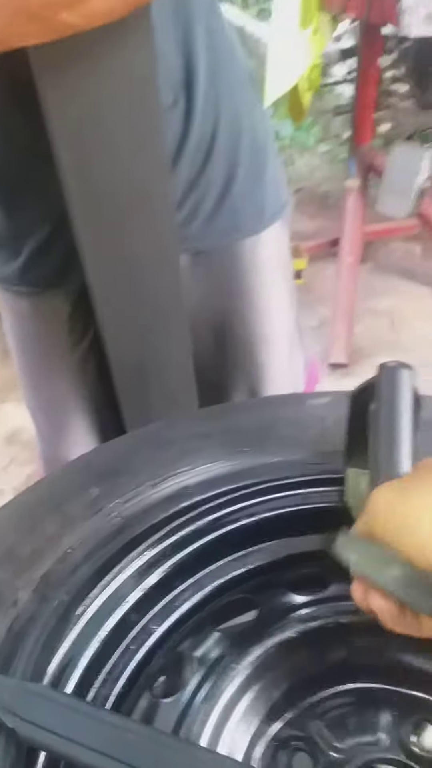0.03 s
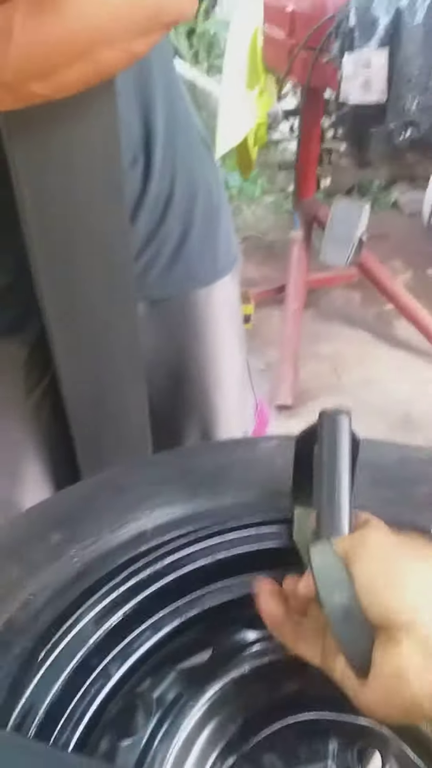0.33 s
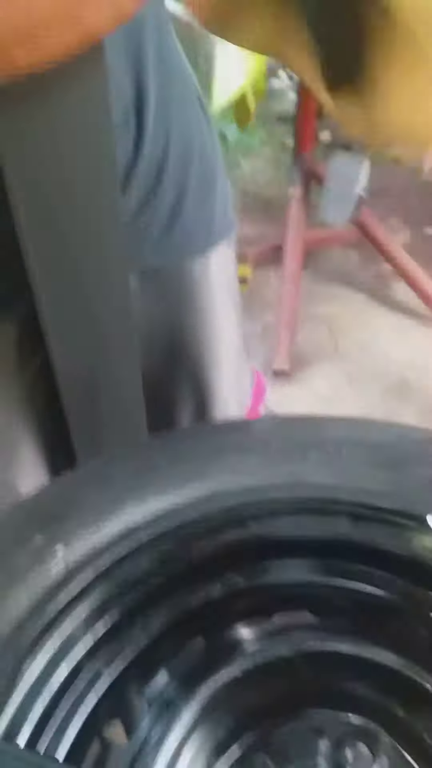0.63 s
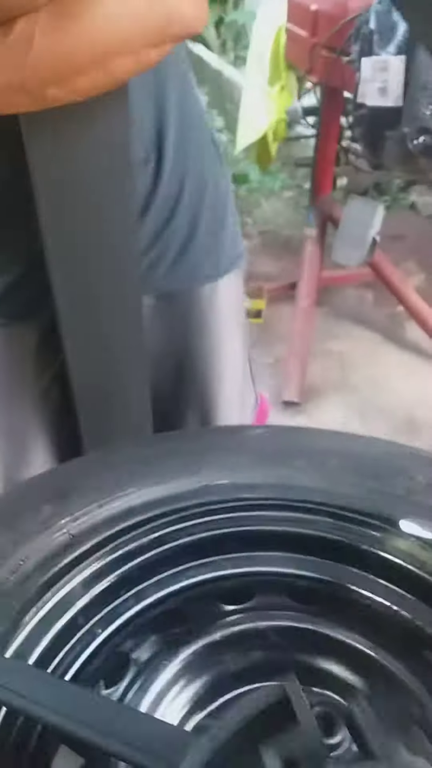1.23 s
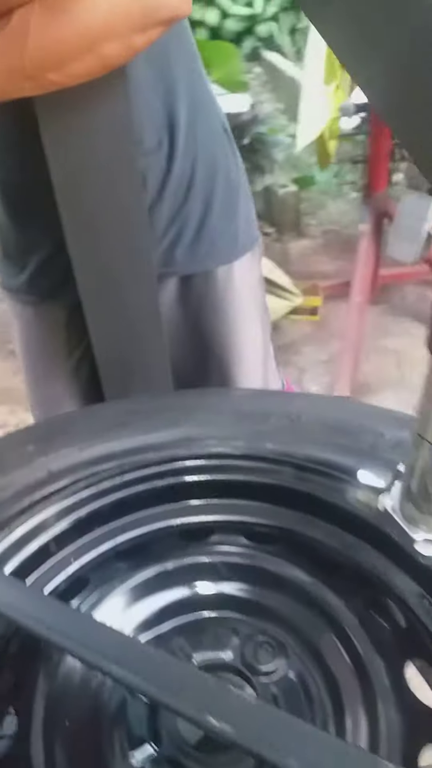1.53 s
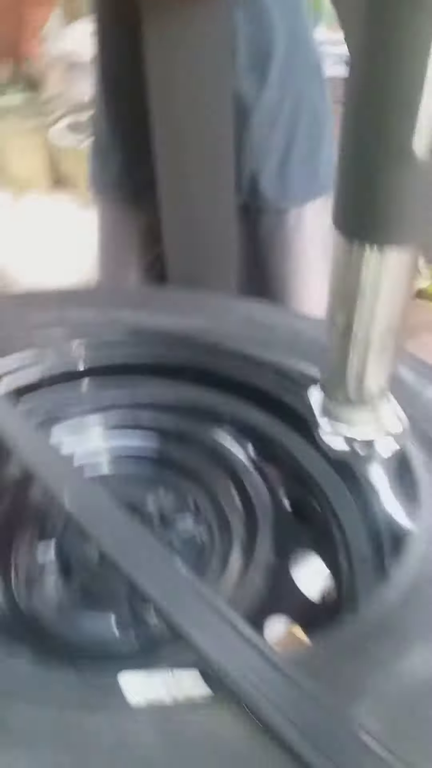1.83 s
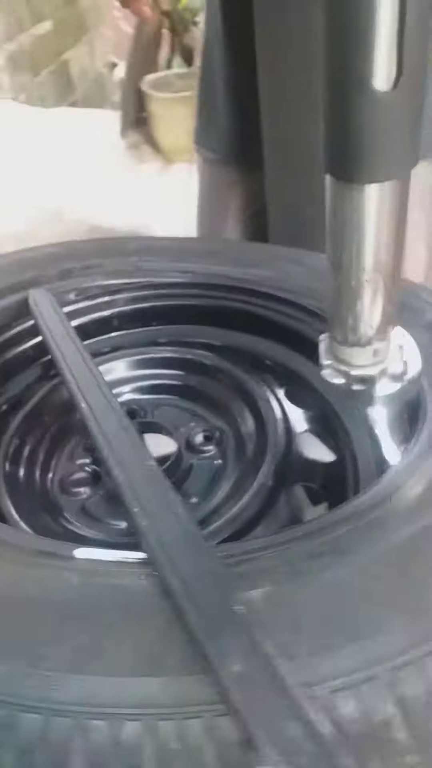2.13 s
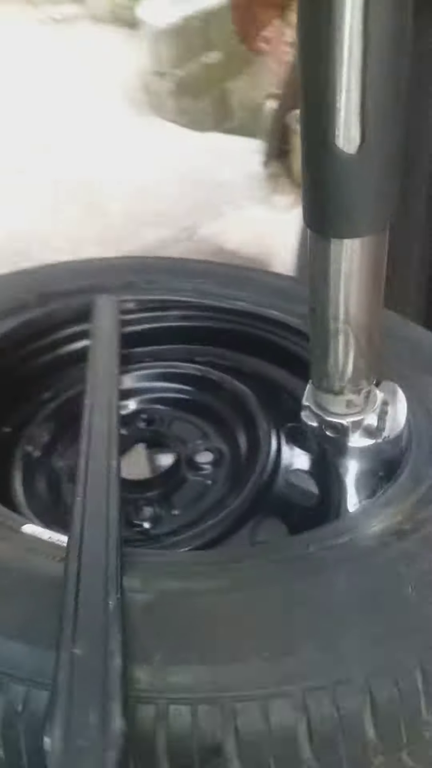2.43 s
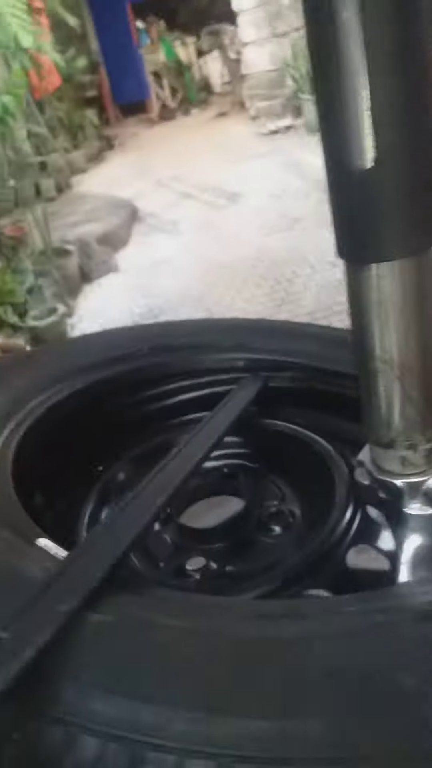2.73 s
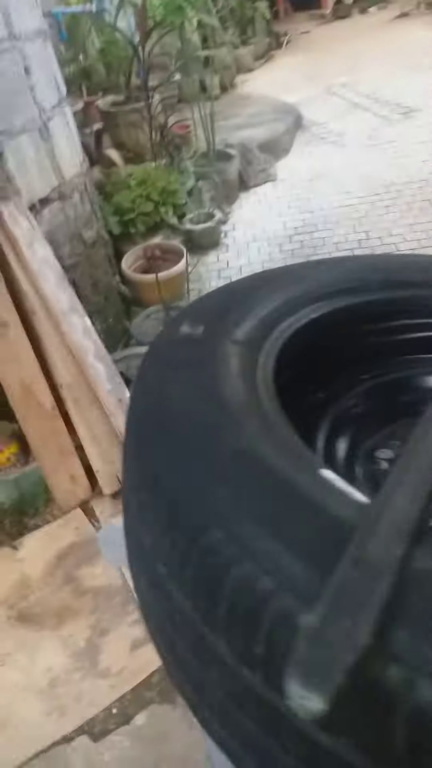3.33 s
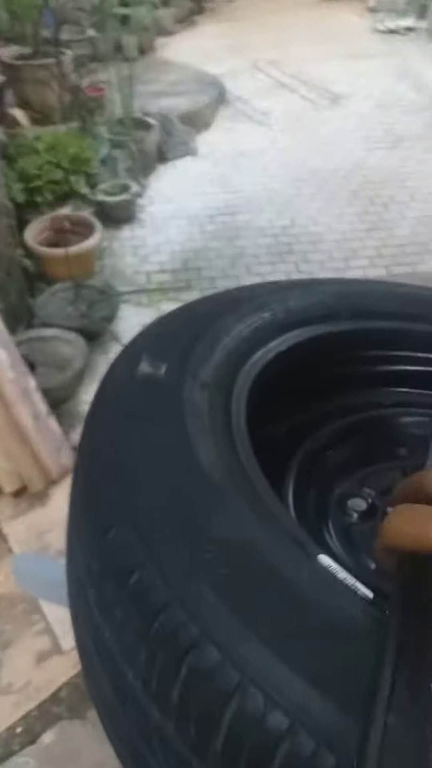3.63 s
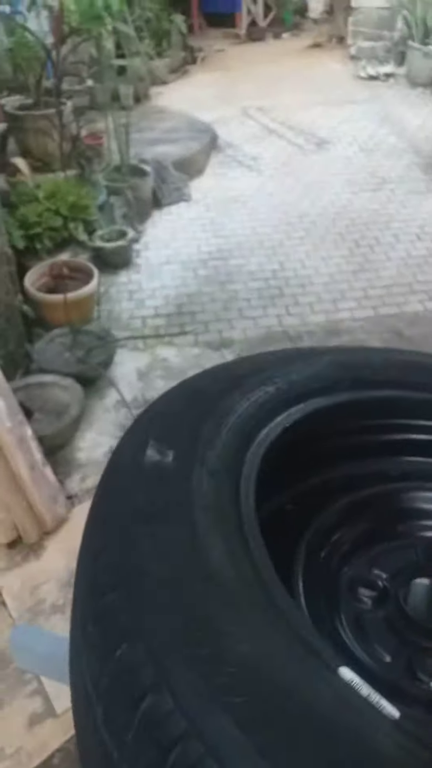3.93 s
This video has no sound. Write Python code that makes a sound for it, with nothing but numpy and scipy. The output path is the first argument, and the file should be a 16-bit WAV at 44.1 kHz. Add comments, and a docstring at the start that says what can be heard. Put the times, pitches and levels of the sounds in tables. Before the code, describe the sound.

Steel tools clank on a wheel rim, close up in an open yard. A scrape and clink lead to a bouncing clang; after a lull a tyre lever rattles, clacks and rings once more, over soft handling bumps.

```python
"""A short scrape, a squeak and two soft bumps, then the clink of a hand tool: work at a tyre changer
in an open yard, heard from a hand-held microphone close to the wheel. Steel drops on the rim and
bounces; later a tyre lever rattles under quick blows, and rings once more at the end. Between them
come damped clacks, sliding friction and handling bumps, over a low rumble and quiet air.
The yard returns a thin tail of reflections, and a limiter flattens the loudest blows."""
import sys
import numpy as np
from scipy import signal
from scipy.fft import rfft, irfft
from scipy.io import wavfile
from scipy.ndimage import uniform_filter1d

SR = 44100
rng = np.random.default_rng(int(sys.argv[2]) if len(sys.argv) > 2 else 0)


def file_out(sig):
    """Save sig as 16-bit WAV at sys.argv[1]."""
    # one column per channel
    cols = np.atleast_2d(sig).T
    # limit, then scale
    lim = np.clip(cols, -1, 1)
    pcm = np.round(lim * 32767).astype(np.int16)
    wavfile.write(sys.argv[1], SR, pcm)


N = 176400
TIME = np.arange(N) / SR
T = np.arange(SR // 2) / SR  # time since a blow [s]
BAND_LIMIT_HZ = 15800

# Blows on the tyre lever, close up (time [s], ring [dB], clatter [dB], place on the bar)
LEVER_HITS = [(2.603, -12, -10.5, "tip"), (2.634, -11, -13.5, "tip"), (2.668, -13, -10.5, "edge"),
              (2.686, -9, -12.5, "edge"), (2.704, -11, -15.5, "edge"), (2.723, -24.5, -14.5, "edge"),
              (2.765, -33.5, -25.5, "tip"), (3.711, -45.5, -43, "edge"), (3.7808, -8.5, -19.5, "flat")]
# Contact at each place (clatter tilt [dB/octave], share of the free ring time)
LEVER_CONTACT = dict(tip=(2.3, 1), edge=(0, 0.75), flat=(-5, .92))
# For each place, the clear modes from low to high (level [dB])
LEVER_BALANCE = dict( tip=[-11, -19, -6, -6.5, -14, -37, -24, -2.5, -22, 0.5, 2, -10, -8.5, -0.5, -16, -11.5, -6, -9.5, -27, -12, -21],
                 edge=[-5, -13, 2, -9, -12, -24, -28, -4, -16, -9.5, -0.5, 1.5, -3.5, -13, -6.5, -16, -18.5, -22.5, -15, -22, -18],
                 flat=[.5, -3.5, -7, -38, -13, -8, -6.5, -11.5, -10.5, -11.5, -19, -9, -19, -18, -10.5, -42, -22, -24, -50, -60, -52])
# Clatter under the ring (frequency [Hz], spectral level [dB], t60 [s])
LEVER_CLATTER = [(330, -18, 0.39), (1460, -2.5, 0.36), (5240, -2, 0.18), (7300, -6.5, 0.12),
                 (8800, -14, .16), (15500, -18.5, 0.45)]

def lever(choke_db=-3.5, contact_hz=5000, crack_db=-2.5, crack_t60_s=0.059):
    """The steel bar rings with the same modes every time; the place of the blow sets their balance."""
    out = np.zeros(N)
    hz, sizes, waves = jangle()
    for s, ring_db, clatter_db, place in LEVER_HITS:
        tilt_db, ring_share = LEVER_CONTACT[place]
        out[round(s * SR):] *= amp(choke_db)  # each new contact damps what still rings
        # a softer contact dulls the clatter above contact_hz
        push = sizes * amp(tilt_db * np.log2(np.maximum(hz, contact_hz)))
        clatter = strike(waves, np.sqrt(2) * push / np.linalg.norm(push))
        crack = amp(crack_db) * noise(LEVER_CLATTER, tilt_db / 2) * fade(crack_t60_s)
        clear = lever_ring(amp(LEVER_BALANCE[place]), ring_share)
        add(out, s, amp(ring_db) * clear + amp(clatter_db) * (clatter + crack))
    return out

def jangle(count=190, scatter_db=11.5):
    """The lever's many weak, short modes: their pitches, sizes and decaying waves."""
    spread = (np.arange(count) + rng.random(count)) / count
    hz = 250 + 15500 * spread ** 2
    sizes = amp(read(LEVER_CLATTER, hz) + scatter_db * rng.uniform(-1.4, 1, count)) * np.sqrt(spread)
    return hz, sizes, mode_waves(hz, read(LEVER_CLATTER, hz, column=2))

# The lever's clear modes (frequency [Hz])
LEVER_PITCHES = [1459, 1821, 2378, 3580, 3748, 4021, 4351, 4558, 4889, 5374, 5678, 5760, 6822, 7012, 8093,
                 8469, 9480, 10957, 11455, 13004, 14261]
# Free ring of the same modes (t60 [s])
LEVER_DECAYS = [.56, .68, .22, .25, 0.56, 0.2, 0.49, .25, .24, .27, .33, .2, 0.27, 0.19, .15, 0.53, 0.15,
                .18, .2, .24, .19]

def lever_ring(sizes, ring_share, twin_db=-8, detune=0.007):
    """The lever's clear ring: its upper modes beat against weaker, slightly detuned twins."""
    hz = np.array(LEVER_PITCHES)
    t60 = ring_share * np.array(LEVER_DECAYS)
    twin_hz = hz * (1 + detune * rng.standard_normal(len(hz)))
    twin_sizes = amp(twin_db) * sizes * np.minimum(hz / np.median(hz), 1) ** 2
    return strike(mode_waves(hz, t60), sizes) + strike(mode_waves(twin_hz, t60), twin_sizes)

# Blows on the rim, close to the microphone (time [s], ring [dB], crash [dB], tilt [dB/octave])
RIM_HITS = [(.573, -23.5, -8, 4), (.588, -25.5, -15.5, -0.5), (0.596, -10.5, -9.5, 1.5),
            (.611, -27.5, -11.5, 2)]
# Clear modes of the rim (frequency [Hz], level [dB], t60 [s])
RIM_MODES = [(833, -4, 0.41), (938, -2.5, 0.14), (1035, -12.5, .46), (1104, -7.5, 0.35), (1663, -5, .22),
             (1844, -11, 0.51)]
# Dense modes of wheel and machine (frequency [Hz], spectral level [dB], t60 [s])
MACHINE_MODES = [(200, -6.5, 0.42), (620, 2, 0.35), (885, 4.5, 0.4), (1830, -1, 0.18), (4860, -4, 0.091),
                 (11000, -34, 0.18)]

def rim(crack_t60_s=0.041, wash_db=-4.5):
    """Steel drops on the wheel and bounces: each blow cracks, washes through the metal and rings."""
    out = np.zeros(N)
    for s, ring_db, crash_db, tilt_db in RIM_HITS:
        crack = noise(MACHINE_MODES, tilt_db) * fade(crack_t60_s)
        wash = amp(wash_db) * dense_ring(MACHINE_MODES, tilt_db)
        add(out, s, amp(ring_db) * ring(RIM_MODES) + amp(crash_db) * (crack + wash))
    return out

# Clacks around the wheel (time [s], level [dB], tilt [dB/octave], t60 [s])
CLACK_HITS = [(.505, -13.5, -4, 0.048), (0.513, -9.5, 0.5, 0.041), (0.535, -22.5, -3, 0.05),
              (.855, -11.5, -2, 0.039), (2.058, -33, 0.5, 0.18), (2.484, -32.5, -4, 0.057),
              (3.054, -4, 1.5, 0.022), (3.433, -26, 5.5, 0.036), (3.442, -28.5, -0.5, 0.1),
              (3.483, -14.5, -1.5, 0.014), (3.584, -34, -2, 0.11), (3.67, -18.5, -5, 0.013)]
# Colour of a clack (frequency [Hz], spectral level [dB])
CLACK_SPECTRUM = [(100, -16), (700, 1), (5000, -3.5), (7500, -9.5), (9500, -21), (15500, -15.5)]
# Modes of a hollow body (frequency [Hz], level [dB], t60 [s])
HOLLOW_MODES = [(616, -30, .14), (756, -20, 0.029)]

def clacks(rise_s=0.002, tail_db=-21.5, tail_t60_s=0.25, hollow_at_s=3.483):
    """Damped metal contacts: a short crack and a weak tail. One also sounds a hollow body."""
    out = np.zeros(N)
    for s, db, tilt_db, t60 in CLACK_HITS:
        crack = noise(CLACK_SPECTRUM, tilt_db) * fade(t60)
        tail = amp(tail_db) * noise(CLACK_SPECTRUM, tilt_db - 0.5) * fade(tail_t60_s)
        add(out, s, amp(db) * (crack + tail) * np.minimum(T / rise_s, 1))
    add(out, hollow_at_s, ring(HOLLOW_MODES))
    return out

# Modes of the small hand tool (frequency [Hz], level [dB], t60 [s])
TOOL_MODES = [(770, -4, .2), (1120, 1, 0.13), (1880, -5.5, 0.1), (2680, -12, 0.2), (4020, -14, 0.11)]

def tool(at_s=0.277, ring_db=-18.5, machine_db=-25.5):
    """The hand tool ends its slide with a light clink against the machine."""
    out = np.zeros(N)
    add(out, at_s, amp(ring_db) * ring(TOOL_MODES))
    add(out, at_s, amp(machine_db) * dense_ring(MACHINE_MODES, tilt_db=-2.5))
    return out

# Scrapes and rustles nearby (start [s], end [s], level [dB])
SLIDES = [(-.02, 0.109, -38.5), (.19, 0.274, -33), (.45, 0.537, -33), (1.751, 1.786, -46.5),
          (2.13, 2.198, -43), (2.39, 2.449, -43)]
# Colour of the friction (frequency [Hz], spectral level [dB])
SCRAPE_SPECTRUM = [(150, -9), (600, -0.5), (2500, -4), (7500, -9.5), (9500, -21), (15500, -15)]

def scrapes(swell_power=0.55, fall_s=0.011, grain_db=1.5):
    """Grainy friction that swells while something slides and dies when it stops."""
    level = np.zeros(N)
    for start, end, db in SLIDES:
        swell = np.clip((TIME - start) / (end - start), 0, 1) ** swell_power
        level += amp(db) * swell * np.exp(-np.maximum(TIME - end, 0) / fall_s)
    return level * amp(grain_db * wobble(N, span=130)) * noise(SCRAPE_SPECTRUM, size=N)

# Faint squeaks (time [s], length [s], pitch [Hz], rise [share of pitch], level [dB])
METAL_SQUEAKS = [(.04, .08, 2050, .27, -37), (2.08, .22, 12300, .18, -65), (2.34, .13, 12000, .13, -61)]

def squeaks(waver_hz=70):
    """Sliding metal sticks and slips, each time in one broken, wavering arch of pitch."""
    out = np.zeros(N)
    for s, length, hz, rise, db in METAL_SQUEAKS:
        arch = np.sin(np.pi * T[T < length] / length)
        pitch = hz * (1 + rise * arch) + waver_hz * wobble(len(arch), span=150)
        grip = abs(wobble(len(arch), span=150))
        phase = 2 * np.pi * np.cumsum(pitch) / SR
        octave = 0.5 * np.sin(2 * phase) * (2 * hz < BAND_LIMIT_HZ)
        add(out, s, amp(db) * arch * grip * (np.sin(phase) + octave))
    return out

# Soft handling bumps, and the low thud under the lever's last blow at 3.783 s (time [s], level [dB], starting
# pitch [Hz])
HANDLING_BUMPS = [(.107, -18, 264), (.147, -17.5, 112), (.503, -18.5, 252), (0.713, -26, 109.5),
                  (1.486, -27.5, 122), (1.770, -12.5, 207), (1.818, -27.5, 137.6), (2.367, -21.5, 327),
                  (2.425, -15, 266), (2.440, -14.5, 206), (2.507, -13.5, 186), (3.783, -35.5, 340)]
# Handling rumble at the microphone (time [s], level [dB])
RUMBLE_CURVE = [(0, -27.5), (.45, -42.5), (.9, -44), (1.25, -59), (1.449, -37.5), (1.6, -49.5),
                (1.85, -41.5), (2.3, -57), (2.53, -26), (2.8, -37), (3.11, -42.5), (3.22, -65)]
# Colour of the rumble (frequency [Hz], spectral level [dB])
RUMBLE_SPECTRUM = [(20, -57), (70, 3), (200, -5.5), (350, -18), (2000, -71)]

def handling(rise_cycles=0.63, sag=0.15, grit_gain=0.53):
    """Low bumps of a cycle or two that sag in pitch, over an uneven rumble."""
    out = noise(RUMBLE_SPECTRUM, size=N) * gain_curve(RUMBLE_CURVE)
    for s, db, hz in HANDLING_BUMPS:
        age = T * hz / rise_cycles  # 1 at the bump's peak
        turns = hz * np.cumsum(1 / (1 + sag * age)) / SR
        grit = grit_gain * noise([(hz / 2, -10), (hz * 1.46, 0), (hz * 12, -65)])
        add(out, s, amp(db) * age * np.exp(1 - age) * (np.sin(2 * np.pi * turns) + grit))
    return out

def yard(work, level_db=-20, t60_s=0.48, echoes_per_s=2000, gap_s=0.006):
    """The open yard sends a thin tail of scattered reflections back to the microphone."""
    taps = rng.standard_normal(len(T)) * (rng.random(len(T)) < echoes_per_s / SR)
    taps *= fade(t60_s) * (T > gap_s)
    return amp(level_db) * signal.fftconvolve(work, taps / np.linalg.norm(taps))[:N]

# Background hiss of the yard (time [s], level [dB])
AIR_CURVE = [(.4, -48), (1.05, -56.5), (1.65, -55.5), (2.45, -44.5), (3.25, -57)]
# Colour of the hiss (frequency [Hz], spectral level [dB])
AIR_SPECTRUM = [(59, -24), (100, -11.5), (471, -5), (1830, -12), (7500, -22), (9000, -32), (16000, -27.5)]

def air():
    """Quiet open air behind the work, slowly falling and rising."""
    return gain_curve(AIR_CURVE) * noise(AIR_SPECTRUM, size=N)

def ring(modes):
    """Decaying partials from rows (frequency [Hz], level [dB], t60 [s])."""
    hz, db, t60 = np.transpose(modes)
    return strike(mode_waves(hz, t60), amp(db))

def dense_ring(table, tilt_db, rise_s=0.00089):
    """Modes too dense to tell apart, each band dying at its own speed."""
    hz, t, bands = signal.stft(noise(table, tilt_db), SR, nperseg=256)
    bands *= np.exp(-np.log(1000) * t / read(table, hz, column=2)[:, None])
    return signal.istft(bands, SR, nperseg=256)[1][:len(T)] * np.minimum(T / rise_s, 1)

def mode_waves(hz, t60):
    """One decaying complex wave for each mode."""
    poles = 2j * np.pi * hz - np.log(1000) / t60
    return np.exp(np.outer(poles, T))

def strike(waves, sizes, rise_s=0.0033):
    """Sums the modes of one blow, each at a chance phase."""
    push = sizes * np.exp(2j * np.pi * rng.random(len(sizes)))
    return (push @ waves).real * np.minimum(T / rise_s, 1)

def noise(spectrum, tilt_db=0, size=len(T)):
    """Noise of rms 1 with a spectrum and a tilt per octave above 400 Hz."""
    hz = np.fft.rfftfreq(size, 1 / SR)
    colour = amp(read(spectrum, hz) + tilt_db * np.log2(np.maximum(hz, 400)))
    return unit(irfft(rfft(rng.standard_normal(size)) * colour, size))

def wobble(size, span):
    """Random motion of rms 1, smoothed over span samples."""
    return unit(uniform_filter1d(rng.standard_normal(size), span))

def fade(t60):
    """Exponential decay, 60 dB down after t60 seconds."""
    return np.exp(-np.log(1000) * T / t60)

def gain_curve(table):
    """Gain at each sample from rows (time [s], level [dB])."""
    return amp(np.interp(TIME, *np.transpose(table)))

def read(table, hz, column=1):
    """One column of a table along log frequency."""
    rows = np.array(table)
    return np.interp(np.log(hz + 1), np.log(rows[:, 0]), rows[:, column])

def add(mix, s, sound):
    """Adds a sound at time s."""
    part = mix[round(s * SR):][:len(sound)]
    part += sound[:len(part)]

def amp(db):
    """Decibels to gain."""
    return 10 ** (np.asarray(db) / 20)

def unit(x):
    """Scales to rms 1."""
    return x / np.sqrt(np.mean(x ** 2) + 1e-20)

def scene():
    """Metal and friction close up, in mono, with the yard's reflections, handling noise and air."""
    work = lever() + rim() + tool() + clacks() + scrapes() + squeaks()
    return (work + yard(work) + handling() + air())[None]

def record(dry, low_cut_hz=42.5, limit_db=-8, recovery_db_per_s=117):
    """After the microphone: a low cut, a fast limiter, clipping at full scale and the band limit."""
    dry = signal.sosfilt(signal.butter(2, low_cut_hz, "highpass", fs=SR, output="sos"), dry)
    level_db = 10 * np.log10(abs(uniform_filter1d(dry[0] ** 2, size=180)) + 1e-12)  # 4 ms average
    fall_db = TIME * recovery_db_per_s
    held_db = np.maximum.accumulate(level_db + fall_db) - fall_db  # jumps to each peak, then sinks
    cut_db = uniform_filter1d(np.maximum(held_db - limit_db, 0), size=90)
    limited = np.clip(dry / amp(cut_db), -1, 1)
    lowpass = signal.firwin(401, BAND_LIMIT_HZ, window=("kaiser", 8), fs=SR)
    return signal.oaconvolve(limited, lowpass[None], "same")

dry = scene()
out = record(dry)
file_out(out)
```